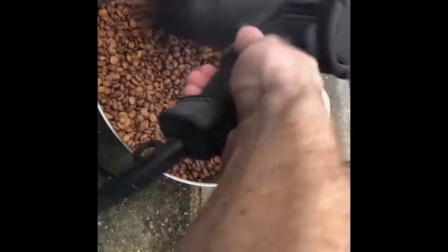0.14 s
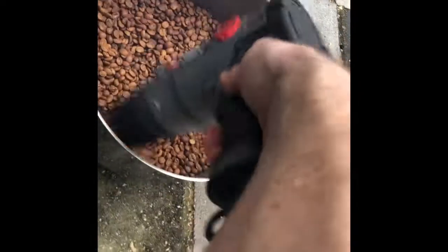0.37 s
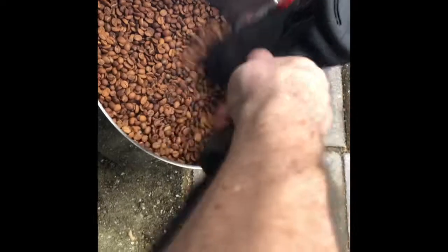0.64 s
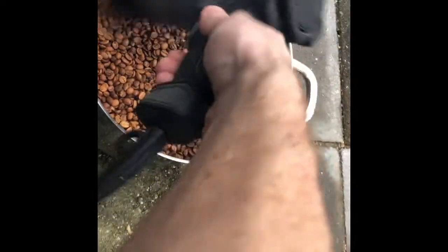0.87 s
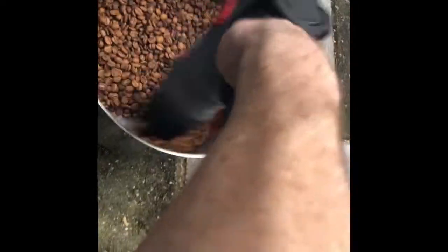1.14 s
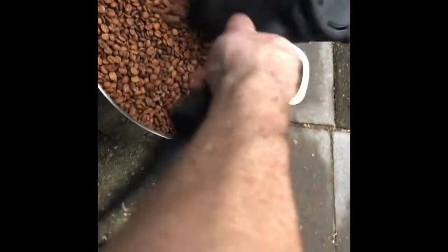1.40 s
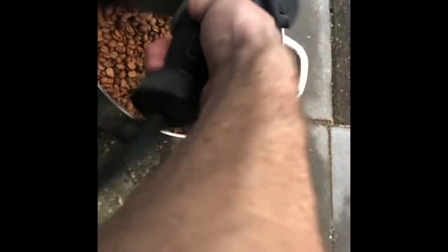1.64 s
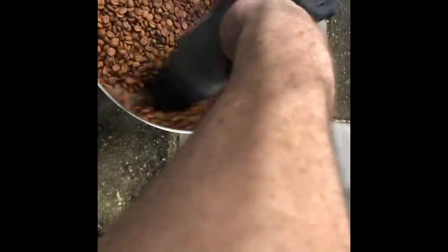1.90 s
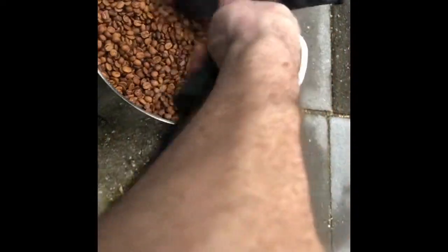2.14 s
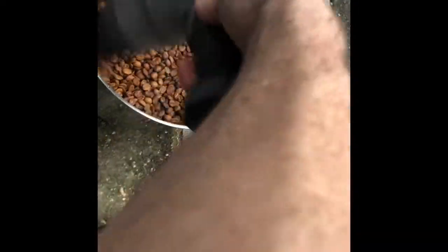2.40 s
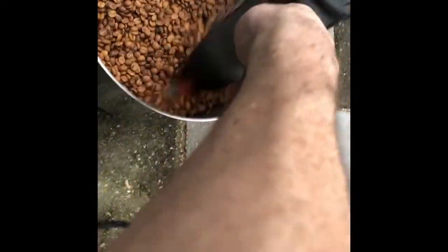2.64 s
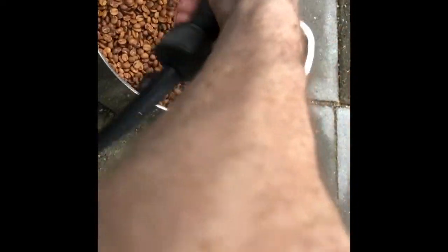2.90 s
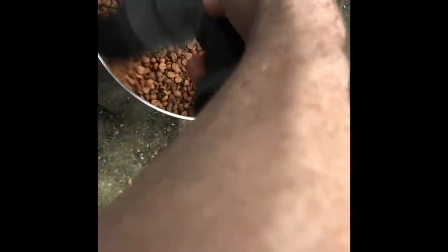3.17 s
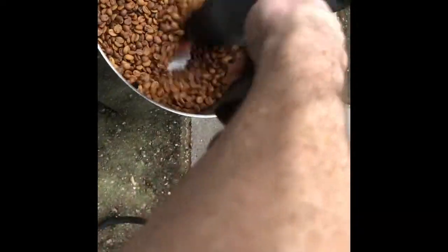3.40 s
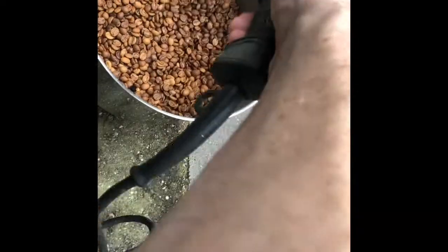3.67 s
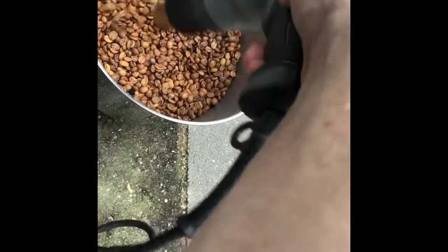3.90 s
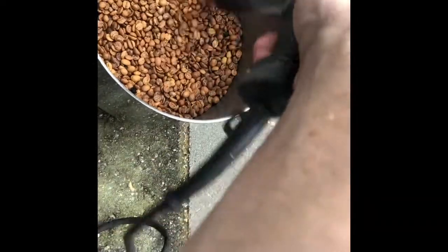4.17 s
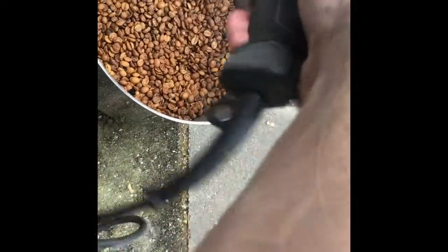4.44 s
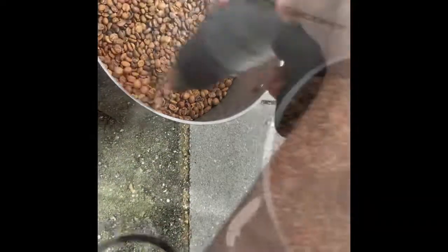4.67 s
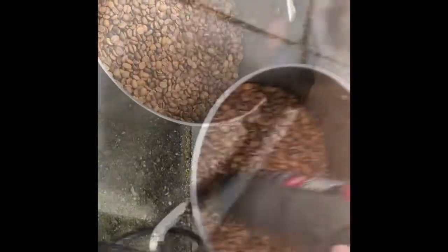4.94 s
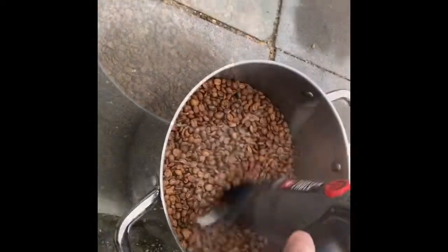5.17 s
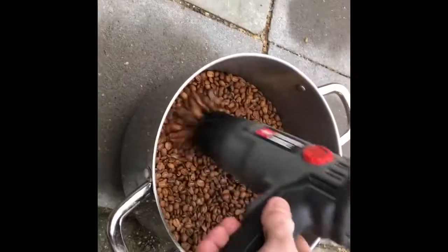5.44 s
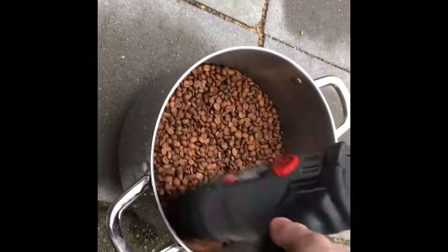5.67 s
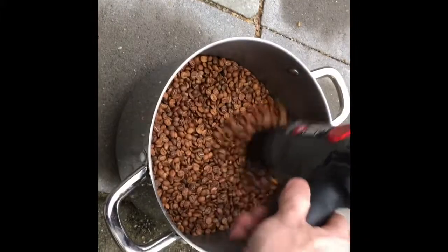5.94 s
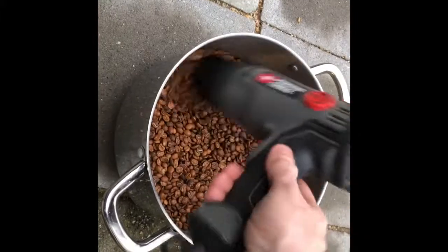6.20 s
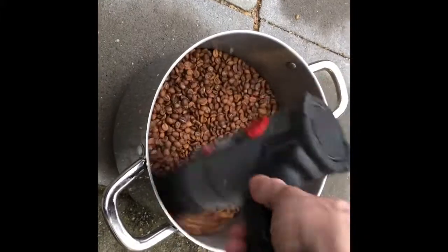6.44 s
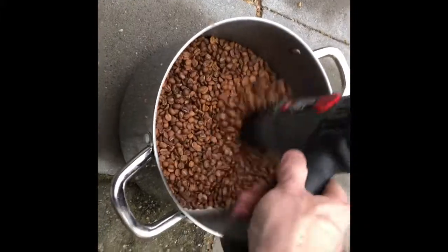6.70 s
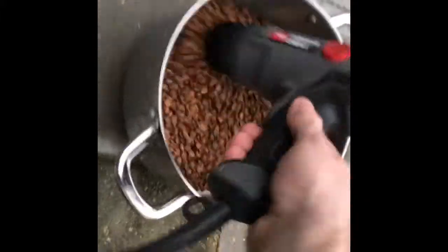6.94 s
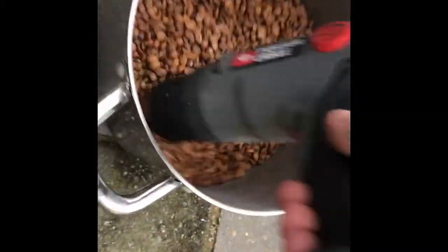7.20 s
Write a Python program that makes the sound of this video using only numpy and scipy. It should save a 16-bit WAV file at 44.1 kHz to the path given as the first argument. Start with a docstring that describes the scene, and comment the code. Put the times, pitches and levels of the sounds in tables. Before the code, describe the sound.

Close, dry outdoor sound of a heat gun blowing into a steel pot of coffee beans. Its airy roar and faint high motor whine never stop, swelling about every 0.7 seconds as it circles. Beans scrape and rattle in overlapping sweeps, with bright pings off the wall and a plastic knock near two seconds. The stirring thins around four seconds, a short whoosh passes, the air tone changes, then strong rattling returns.

```python
"""A heat gun stirs coffee beans in a steel pot outdoors, heard by one close microphone. From the start its air
jet roars through barrel and pot, its motor whines and the beans rattle in sweeps. Soon single hits ring the
steel wall in short bright modes, and twice the plastic housing knocks on the rim. Past the middle a whoosh
swells once, then within half a second the sound takes on another colour. The jet is shaped noise, the whine a
stack of sines, and the beans and knocks are dying modes with noise."""
import sys
import numpy as np
from scipy import signal
from scipy.fft import rfft, irfft
from scipy.io import wavfile
from scipy.ndimage import uniform_filter1d

SR = 44100
rng = np.random.default_rng(int(sys.argv[2]) if len(sys.argv) > 2 else 0)


def digitize_waveform(pressure):
    """Quantize a signal to 16-bit integers and store it at the path in sys.argv[1].

    Rows of a 2-D input are taken as channels; values are limited to [-1, 1].
    """
    field = np.atleast_2d(pressure).T
    bounded = np.clip(field, -1, 1)
    quanta = np.round(bounded * 32767).astype(np.int16)
    wavfile.write(sys.argv[1], SR, quanta)


def volts_from_db(level):
    """Convert decibel levels to linear amplitude ratios."""
    exponent = np.asarray(level, float) / 20
    return 10 ** exponent


N = 323253  # length in samples


def evened(x):
    """Scales to an rms of 1."""
    return x / np.sqrt(np.mean(x ** 2) + 1e-20)


def unit(size, inside=1):
    """Scales magnitudes so that the chosen bins hold a power of 1."""
    return size / np.sqrt(np.sum(size ** 2 * inside, axis=0))


def read(points, hz):
    """Reads a spectrum on a log-frequency axis."""
    f, value = np.transpose(points)
    return np.interp(np.log(hz + 1), np.log(f + 1), value)


def curves(rows, t):
    """Joins the columns of a table by straight lines in time."""
    s, *columns = np.transpose(rows)
    return [np.interp(t, s, c) for c in columns]


def bump(hz, centre_hz, width):
    """Bell-shaped resonance of height 1."""
    return np.exp(-2 * ((hz - centre_hz) / width) ** 2)


def second_colour(t):
    """Share of the jet's second colour: 0 at first, then rising in a straight line to 1."""
    start_s, length_s = 4.7, 0.44
    return np.clip((t - start_s) / length_s, 0, 1)


# How the fan vents turn to the microphone.
# Each row: time in seconds, how much they face it in dB (each sound takes a share of this).
VENT_TURNS = [(0, -18), (3.3, -9), (3.6, 12), (4.6, 12.5), (4.9, -10), (7.33, -11)]


def facing(t):
    """How much the vents face the microphone, in dB; higher is more direct."""
    return curves(VENT_TURNS, t)[0]


# Once per circle the nozzle points at the microphone side of the pot.
# Each row: time in seconds, hiss in dB (the jet follows only a share of its swing), nozzle resonance in dB,
# pot hollow in dB, change of the nozzle resonance half a circle later in dB.
CIRCLES = [(0.07, -38.5, -35, -36.5, -5), (0.73, -35, -32, -34, -7), (1.45, -34.5, -33.5, -34, -4.5),
           (2.18, -37.5, -33, -33.5, -6), (2.86, -33.5, -32, -33, -4), (3.53, -36.5, -34, -33.5, -2),
           (4.22, -43.5, -35, -36.5, -1.5), (4.95, -49.5, -39, -42, -2.5), (5.43, -42, -36.5, -38, -4.5),
           (6.05, -37, -36, -34, -6), (6.79, -37, -36.5, -36.5, -2), (7.45, -30.5, -36, -37, -3)]


def circling(t):
    """How far the gun points away (0-1), and the levels of hiss, nozzle and hollow that follow from it."""
    narrow = 3  # the higher, the shorter the swell and the longer the dip
    away_hiss_db, away_hollow_db, later_hollow_db = -2.5, -14.5, 6
    s, *_, loss_db = np.transpose(CIRCLES)
    laps = np.interp(t, s, np.arange(len(s)))
    away = 1 - abs(np.cos(np.pi * laps)) ** narrow
    hiss_db, nozzle_db, hollow_db, _ = curves(CIRCLES, t)
    hiss_db = hiss_db + away_hiss_db * away
    nozzle_db = nozzle_db + loss_db[laps.astype(int)] * away
    # the hollow dips less under the second colour
    hollow_db = hollow_db + (away_hollow_db + later_hollow_db * second_colour(t)) * away
    return away, hiss_db, nozzle_db, hollow_db


# Basic colour of the jet. Each row: frequency in Hz, relative level in dB.
JET_COLOUR = [(30, -30), (50, -9), (180, -17.5), (284, -14), (371, -19), (483, -8), (820, -9.5),
              (1300, -12), (2000, -11), (2500, -9), (3050, -14), (4500, -19), (7500, -25), (9500, -28.5),
              (12500, -33), (16000, -32)]
# Peaks and dips from the barrel, a pipe. Each row: frequency in Hz, width in Hz, height in dB.
BARREL = [(519, 60, 4), (690, 78, 2.5), (802, 87, -5), (1410, 130, -7.5), (3350, 100, 4.5)]
# What the second colour adds to the first. Each row: frequency in Hz, change in dB.
COLOUR_CHANGE = [(100, 0), (150, 1.5), (220, -1), (700, 1.5), (1000, -0.5), (1400, 5.5), (2500, -2),
                 (3300, 2), (5000, 0), (11000, 3)]


def jet(patchy_db=1.0):
    """Turbulent air as shaped noise; the nozzle and pot resonances swell as the gun circles and turns."""
    frames, hz = N // 256 + 5, np.fft.rfftfreq(1024, 1 / SR)[:, None]
    a, b, patches = rng.standard_normal((frames, 513, 3)).T
    patches = uniform_filter1d(uniform_filter1d(patches, 10, 0), 20, 1)  # over frequency, then time
    patches = evened(patches)
    t = np.arange(frames) * 256 / SR
    away, hiss_db, nozzle_db, hollow_db = circling(t)
    facing_db = facing(t)

    pipe_db = sum(db * bump(hz, f, w) for f, w, db in BARREL)
    body = unit(volts_from_db(read(JET_COLOUR, hz) + pipe_db), (hz > 2000) & (hz < 3000))
    share = 0.19 + 0.25 * np.clip(hz / 1500, 0, 1)  # the low rumble depends less on direction
    body = body * volts_from_db(share * (hiss_db + 39) - 39 + read(COLOUR_CHANGE, hz) * second_colour(t))

    # both resonances rise on the far side; the nozzle tone tightens as the vents face the microphone
    nozzle_hz, nozzle_width = 1069 * (1 + 0.068 * away), 217 - 4 * facing_db
    nozzle = volts_from_db(nozzle_db) * unit(bump(hz, nozzle_hz, nozzle_width))
    hollow_hz, hollow_width = 1636 * (1 + 0.075 * away), 366
    hollow = volts_from_db(hollow_db) * unit(bump(hz, hollow_hz, hollow_width))

    # a whoosh swells once between two circles, gliding down
    gust_s, gust_db, gust_length_s = 4.45, -36.5, 0.07
    gust_hz, gust_width = 3200 - 5000 * (t - gust_s), 1800
    gust_swell = volts_from_db(gust_db) * np.exp(-.5 * ((t - gust_s) / gust_length_s) ** 2)
    gust = gust_swell * unit(bump(hz, gust_hz, gust_width) + 1e-9)

    # soft roar from the fan vents
    vent = volts_from_db(-55.5 + 0.46 * facing_db) * unit(bump(hz, 328, 200))

    power = body ** 2 + nozzle ** 2 + hollow ** 2 + vent ** 2 + gust ** 2
    size = np.sqrt(power) * volts_from_db(patchy_db * patches)
    spectrum = (a + 1j * b) * size * np.sqrt(3 / 2)
    return signal.istft(spectrum, nperseg=1024, noverlap=768)[1][:N]


# Speed of the motor shaft. Each row: time in seconds, turns per second in Hz.
SHAFT = [(0, 258.5), (1.5, 257.9), (2.2, 259.5), (3.5, 259.5), (3.7, 257.5), (4.0, 256.4), (4.7, 255.5),
         (5.1, 255.2), (5.2, 252.4), (5.6, 256.1), (6.0, 255.8), (6.8, 258.8), (7.1, 260.4)]
# Tones of the motor. Each row: multiple of the shaft speed, level in dB before the vents turn,
# share of the vents' turning that it follows.
ORDERS = [(1, -60, 0.4), (2, -61, .2), (3, -64, .2), (6, -57, .2), (8, -68, 1.7), (35, -76, 1),
          (55, -68, .15)]


def whine(waver=.0004):
    """Multiples of the fan motor's speed, which wavers a little; each follows the turning of the vents."""
    t = np.arange(N) / SR
    drift = evened(uniform_filter1d(rng.standard_normal(N), 8000))
    turn = 2 * np.pi * np.cumsum(curves(SHAFT, t)[0] * (1 + waver * drift)) / SR
    facing_db = facing(t)
    comb = [(k, -68, .15) for k in range(53, 62)]  # a comb of faint high multiples
    return sum(volts_from_db(db + beam * facing_db) * np.sin(k * turn) for k, db, beam in ORDERS + comb)


# Ringing modes of the steel wall. Each row: frequency in Hz, width in Hz (wider dies sooner),
# relative level in dB before a random offset at each spot.
WALL = [(1550, 35, -9), (2270, 30, -11), (2620, 60, -10), (2720, 40, -9), (3328, 45, -3.5), (3897, 38, -5),
        (4255, 80, -1), (4696, 45, -1), (4805, 55, 2), (5222, 50, -4), (5515, 65, -2), (5760, 40, -6),
        (5870, 25, 4), (6030, 60, -4), (6260, 70, -2), (6340, 24, .5), (6570, 80, 0), (6750, 60, -1),
        (7010, 90, -2), (7190, 50, -1), (7270, 45, -1), (7375, 40, -1), (7575, 45, -3), (7935, 50, -6),
        (8665, 50, -4), (8900, 60, -9), (9550, 200, -7), (10290, 110, -8), (10860, 90, -9), (11890, 80, -8),
        (12160, 40, -10), (14900, 60, -13)]
# Colour of the noisy crack. Each row: frequency in Hz, relative level in dB.
CRACK = [(2500, -29.5), (3600, -13.5), (4500, -14.5), (5600, -6.5), (6500, -5.5), (7400, -7), (7800, -13),
         (9300, -13), (11200, -17), (15700, -18)]


def strikes(count, crack_db=-2, crack_t60=0.049, rise=0.00035):
    """A bean on various spots of the wall, as low, middle and top spectra: modes plus a dying crack."""
    t = np.arange(4096) / SR
    hz, width, db = (c[:, None] for c in np.transpose(WALL))
    fine = np.fft.rfftfreq(4096, 1 / SR)
    bright = np.clip((fine - 8000) / 1500, 0, 1)
    low = np.clip((4650 - fine) / 250, 0, 1)
    out = []
    for level_offset, pitch_offset in rng.standard_normal((count, 2, len(WALL), 1)):
        rings = volts_from_db(db + 3.5 * level_offset) * width * np.exp(-np.pi * width * t)
        modes = (rings * np.sin(2 * np.pi * (hz + .1 * width * pitch_offset) * t)).sum(0)
        noise = irfft(rfft(rng.standard_normal(4096)) * volts_from_db(read(CRACK, fine)))
        crack = noise * volts_from_db(-60 * t / crack_t60)
        blow = evened(modes) + volts_from_db(crack_db) * evened(crack)
        whole = rfft(blow * (1 - np.exp(-t / rise)))
        out.append([whole * low, whole * (1 - bright - low), whole * bright])
    out = np.array(out)
    return out / np.sqrt(np.mean(abs(out) ** 2, axis=(0, 2), keepdims=True))


# Sweeps that push beans along the wall. Each row: peak time in seconds, rattle level in dB,
# seconds to rise by 10 dB, seconds to fall by 10 dB, low modes relative to the rattle in dB.
SWEEPS = [(0.06, -29.5, 0.5, .2, -6), (0.16, -22.5, 0.14, .13, -5), (0.48, -22.5, 0.09, 0.28, -8),
          (0.96, -22.5, 0.18, 0.19, -7.5), (1.29, -21, .14, .15, -7.5), (1.7, -20.5, .2, 0.11, -6),
          (2.03, -27, .35, 0.46, -5), (2.32, -19, 0.05, 0.09, -4.5), (2.45, -25, 0.1, .08, -8),
          (2.535, -20, 0.04, .15, -10), (2.73, -24.5, 0.1, 0.18, -6.5), (2.99, -22, 0.33, .24, -7),
          (3.3, -26.5, .06, .2, -5.5), (3.53, -26, 0.13, .07, -3.5), (3.8, -34.5, 0, .19, -3.5),
          (4.39, -37.5, .07, .1, -6), (4.62, -40.5, 0.14, 0.1, -8), (5.12, -35, 0.02, 0.15, -5.5),
          (5.45, -43, .3, 0, 0), (5.615, -24.5, .012, 0.17, -6), (5.7, -20, .06, .13, -9),
          (5.88, -27, 0.19, 0.42, -5), (6.33, -23.5, 0.1, .14, -8), (6.43, -22, 0.13, .12, -9.5),
          (6.62, -29, 0.21, 0.43, -9), (7.06, -29, .1, 0.1, -5), (7.18, -28.5, 0.13, 0.1, -5),
          (7.28, -30, .06, .12, -6)]
# Top modes relative to the rattle. Each row: time in seconds, level in dB.
TOP = [(0, -14), (.4, -12.5), (.75, -15.5), (1.15, -11.5), (1.5, -15), (1.9, -10.5), (2.25, -13.5),
       (4.7, -12.5), (5.15, -10), (5.45, -4), (5.6, -13.5), (5.75, -10), (6.18, -13), (6.33, -9.5),
       (6.5, -12.5), (7.33, -13)]


def stirring():
    """Force on the low, middle and top modes: the powers of all sweeps add up."""
    t = np.arange(0, N, 64) / SR
    rest = volts_from_db(-53.5) ** 2  # power of the rattle between sweeps
    s, db, rise, fall, low_db = (c[:, None] for c in np.transpose(SWEEPS))
    push = volts_from_db(db - 10 * np.where(t < s, (s - t) / rise, (t - s) / fall)) ** 2
    middle = np.sqrt(push.sum(0) + rest)
    low = np.sqrt((push * volts_from_db(low_db) ** 2).sum(0) + rest)
    top = volts_from_db(curves(TOP, t)[0]) * middle
    return np.array([np.interp(np.arange(N) / SR, t, c) for c in (low, middle, top)])


def rattle(spread_db=2.5, beans_per_s=2500):
    """A dense random patter of beans under the sweeps; the struck spot travels round the wall."""
    spots = irfft(strikes(count=24))
    landed = rng.random(N) < beans_per_s / SR
    size = volts_from_db(spread_db * np.minimum(rng.exponential(1, N), 5)) * landed
    size *= rng.choice([-1., 1.], N) / np.sqrt(np.mean(size ** 2))
    spot = (np.arange(N) * 12 // SR + rng.integers(0, 4, N)) % len(spots)  # 12 steps per second
    force = size * stirring()
    out = 0
    for k, parts in enumerate(spots):
        out = out + signal.oaconvolve(force * (spot == k), parts, axes=1)[:, :N].sum(0)
    return out


# Beans flung at the wall. Each row: start in seconds, peak of the duller part in dB,
# treble relative to the duller part in dB, centre of the favoured modes in Hz.
HITS = [(0.244, -14, -26, 5530), (0.3561, -15, -15.5, 6260), (0.4464, -15, -14, 6970),
        (0.9098, -17, -14, 6280), (0.941, -10, -10, 4790), (1.0354, -18, -8, 6000),
        (1.7064, -13, -12, 6560), (2.2696, -15, -25, 4220), (2.4376, -15, -23, 4850),
        (2.517, -10, -9, 6000), (2.7364, -16, -9, 7190), (3.199, -18, -28, 4800), (3.3306, -21, -25, 6970),
        (3.49, -17, -19, 4240), (3.78, -18, -18, 6500), (3.8112, -19, -17, 4240), (3.91, -26, -20, 4870),
        (3.9484, -22.5, -18, 5230), (4.371, -23.5, -27, 4780), (4.594, -20, -9, 6760),
        (4.6329, -25.5, -25, 6580), (4.6693, -29, -25, 7380), (4.705, -23.5, -29, 4840),
        (4.7963, -19, -10, 7500), (5.1143, -17.5, -12, 7100), (5.1472, -19, -35, 5800),
        (5.1736, -22, -25, 6270), (5.224, -23, -24, 5870), (5.6082, -17, -21, 6000),
        (6.2352, -19, -23, 5860), (6.315, -19, -11, 6570), (7.0514, -19.5, -25, 6800),
        (7.166, -18.5, -25, 6910)]


def hits():
    """Beans flung at the wall ring its modes with a sharp crack, each hit favouring one region of them."""
    out, fine = np.zeros(N + 4096), np.fft.rfftfreq(4096, 1 / SR)
    spots = strikes(count=len(HITS), crack_db=5.0, crack_t60=0.11, rise=0.00022)
    for (s, db, bright_db, hz), (low, middle, bright) in zip(HITS, spots):
        favoured = volts_from_db(6 * bump(fine, hz, 2500))  # up to 6 dB more
        dull = evened(irfft((volts_from_db(-6) * low + middle) * favoured))
        treble = evened(irfft(bright))
        hit = (dull + volts_from_db(bright_db) * treble) / abs(dull).max()
        out[round(s * SR):][:4096] += volts_from_db(db) * hit
    return out[:N]


# Housing on the rim. Each row: start in seconds, level in dB.
KNOCKS = [(1.808, -8), (3.309, -20)]
# Modes of the plastic housing. Each row: frequency in Hz, relative level in dB,
# seconds to die by 60 dB.
HOUSING = [(460, -8, 0.025), (950, -9, 0.03), (1230, -6, 0.033), (1700, -3, 0.024), (2250, 2, 0.009),
           (3150, 4, 0.007)]


def knocks(clack_db=-12, cycles=1.2):
    """A dull plastic blow: short modes that each build over a cycle or so, and a faint clack."""
    t = np.arange(4096) / SR
    ring = 0
    for hz, db, t60 in HOUSING:
        envelope = volts_from_db(db - 60 * t / t60) * (1 - np.exp(-t * hz / cycles))
        ring = ring + envelope * np.sin(2 * np.pi * hz * t)
    band = signal.butter(2, [500, 3200], "band", fs=SR)
    clack = evened(signal.lfilter(*band, rng.standard_normal(4096)))
    knock = ring / abs(ring).max() + volts_from_db(clack_db - 60 * t / 0.021) * clack
    knock = knock * (1 - np.exp(-t / 0.00082))  # soft onset
    out = np.zeros(N + 4096)
    for s, db in KNOCKS:
        out[round(s * SR):][:4096] += volts_from_db(db) * knock
    return out[:N]


def scene():
    """One microphone feeds both channels."""
    return np.tile(jet() + whine() + rattle() + hits() + knocks(), (2, 1))


def top_cut(x):
    """Nothing passes above the cut-off."""
    return signal.sosfilt(signal.butter(12, 15760, fs=SR, output="sos"), x)


def record(dry):
    """Little is kept below 50 Hz, and the treble ends steeply near 15780 Hz."""
    low_cut = signal.butter(4, 50, "high", fs=SR, output="sos")
    cut = signal.sosfilt(low_cut, dry)
    edge = signal.firwin(1023, 15780, window=("kaiser", 10), fs=SR)[None]
    mix = signal.oaconvolve(cut, edge, "same")
    return top_cut(mix)


dry = scene()
out = record(dry)
digitize_waveform(out)
```